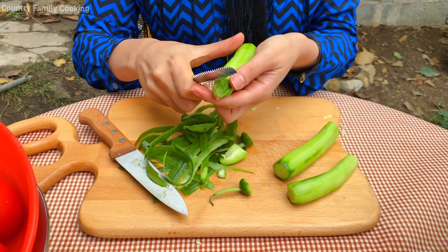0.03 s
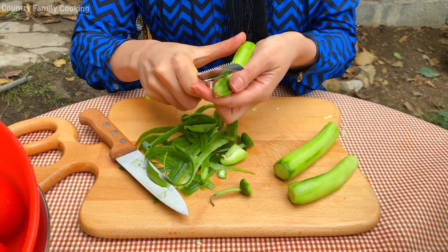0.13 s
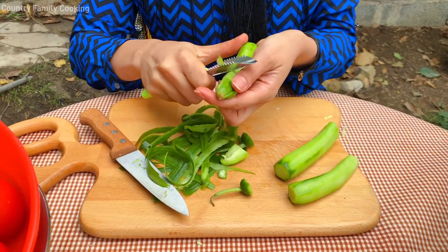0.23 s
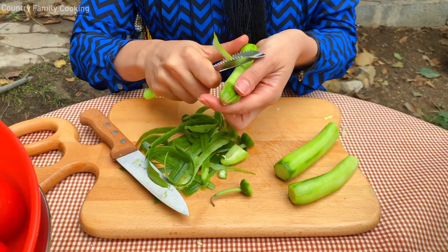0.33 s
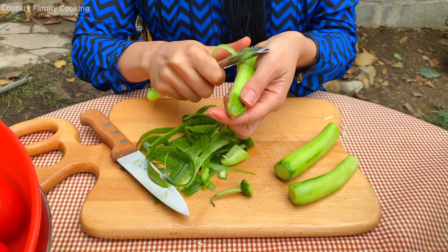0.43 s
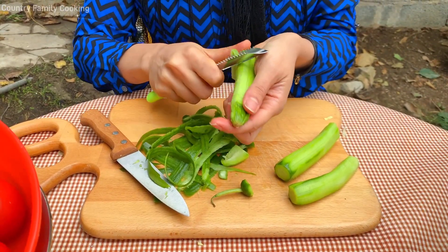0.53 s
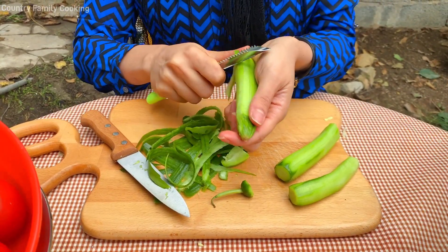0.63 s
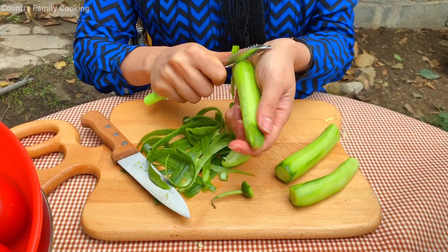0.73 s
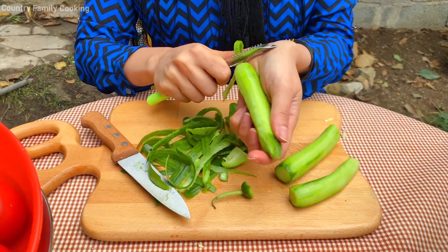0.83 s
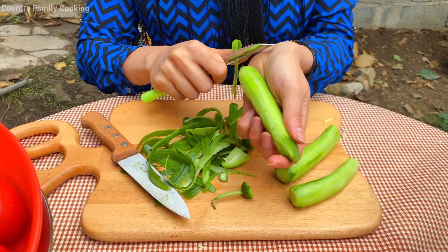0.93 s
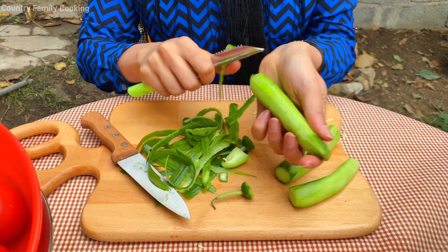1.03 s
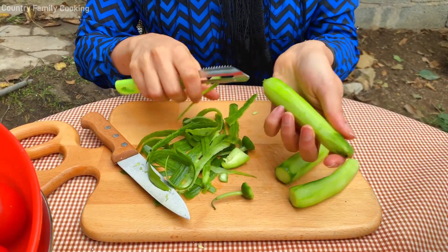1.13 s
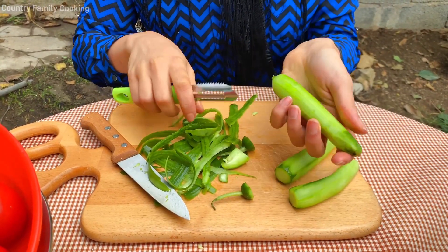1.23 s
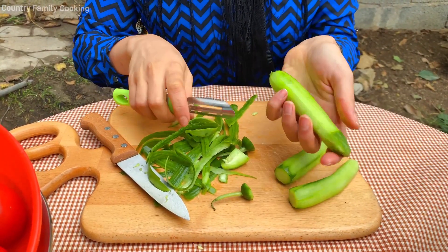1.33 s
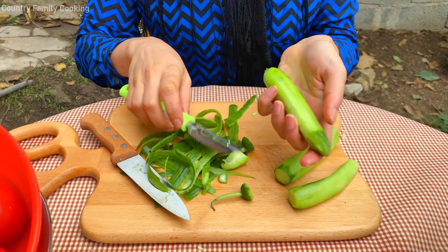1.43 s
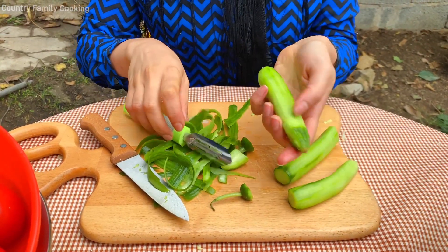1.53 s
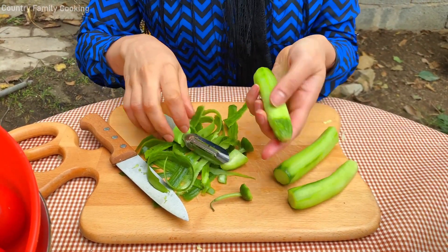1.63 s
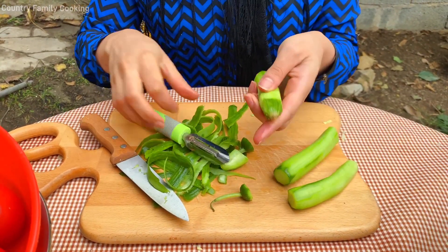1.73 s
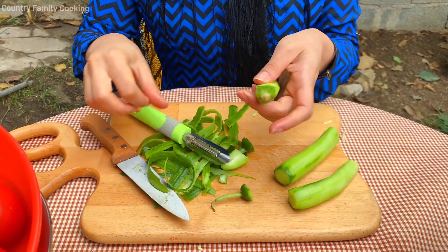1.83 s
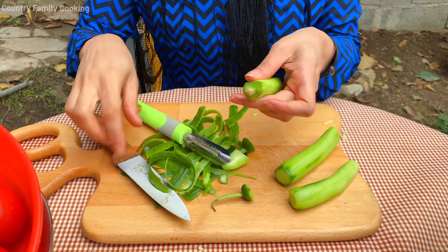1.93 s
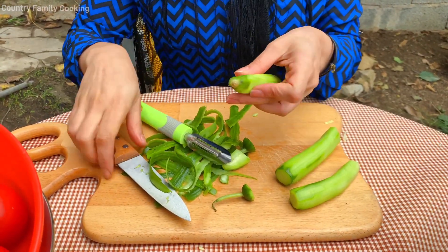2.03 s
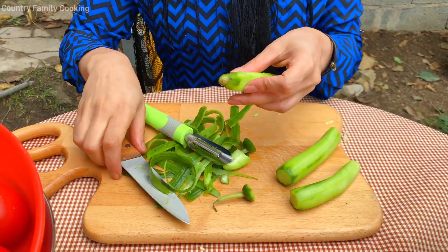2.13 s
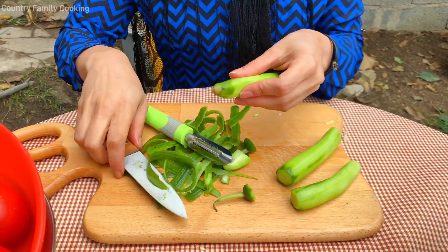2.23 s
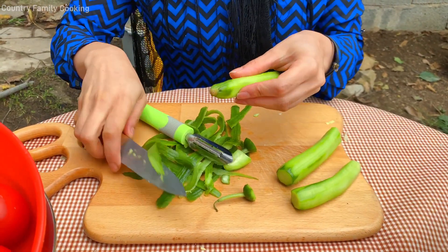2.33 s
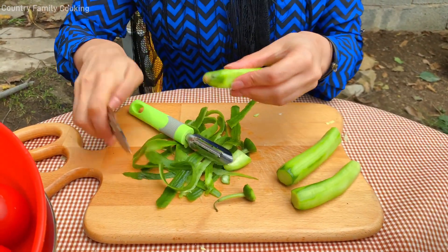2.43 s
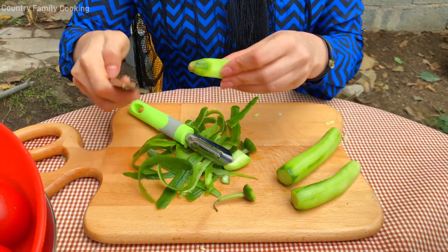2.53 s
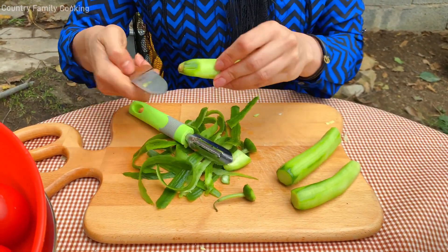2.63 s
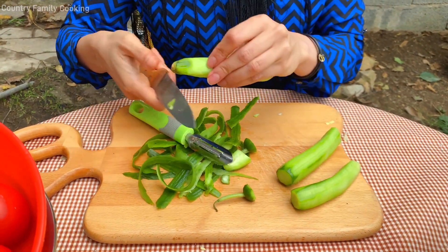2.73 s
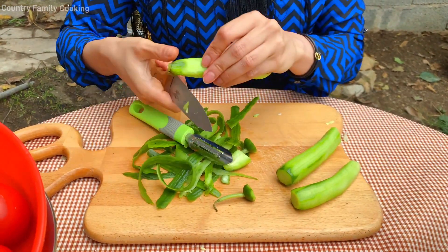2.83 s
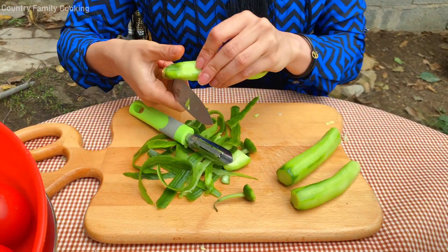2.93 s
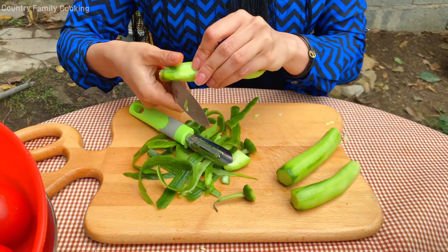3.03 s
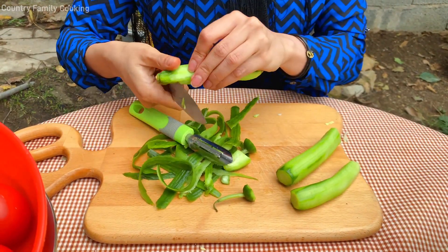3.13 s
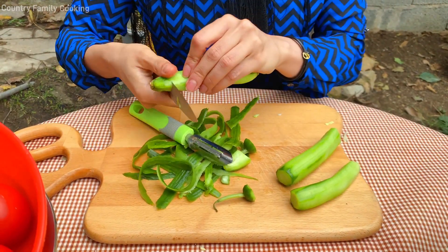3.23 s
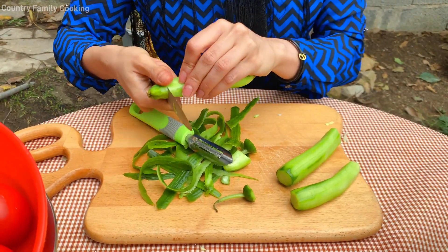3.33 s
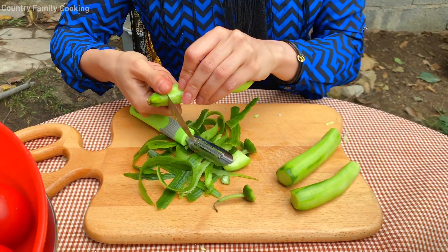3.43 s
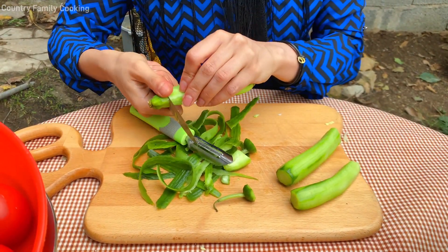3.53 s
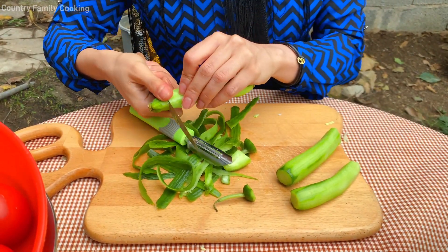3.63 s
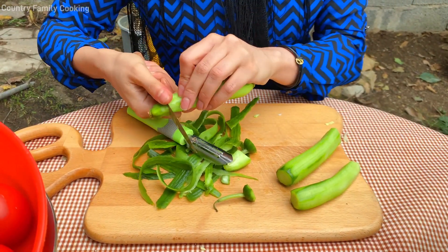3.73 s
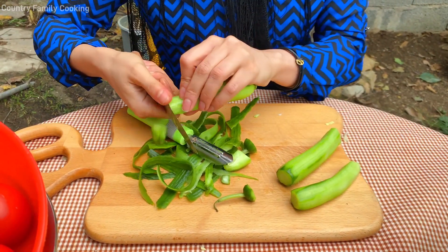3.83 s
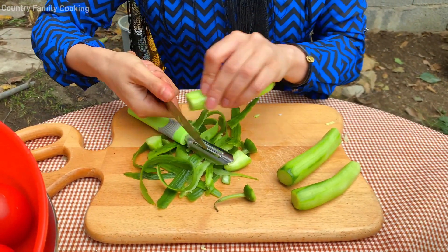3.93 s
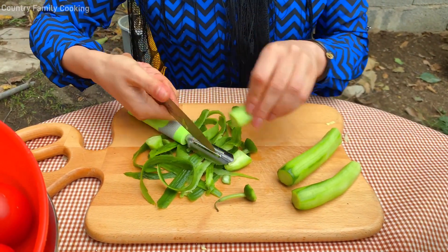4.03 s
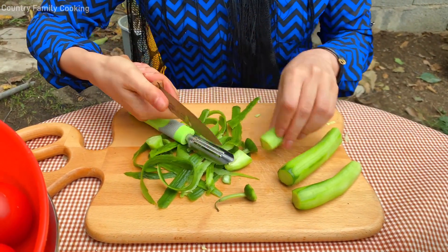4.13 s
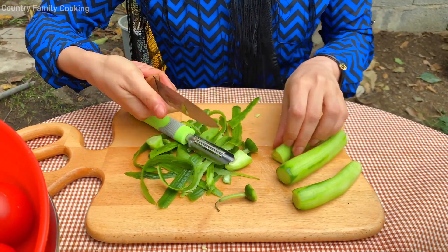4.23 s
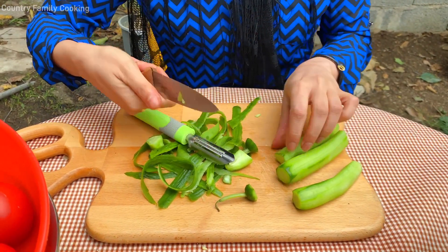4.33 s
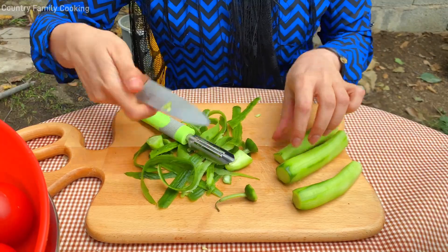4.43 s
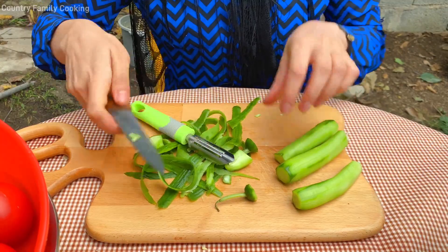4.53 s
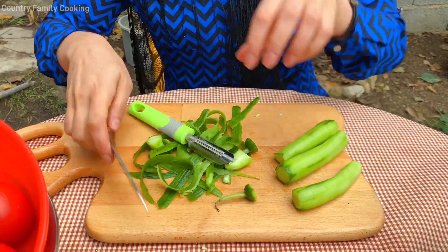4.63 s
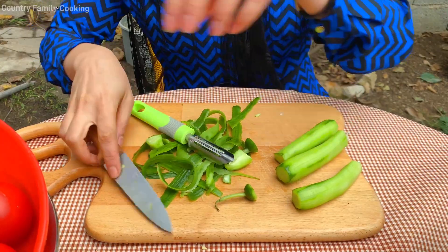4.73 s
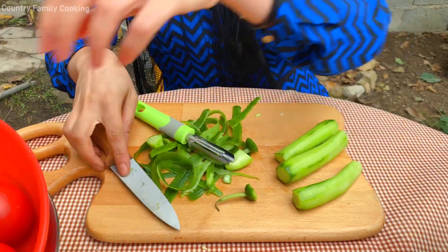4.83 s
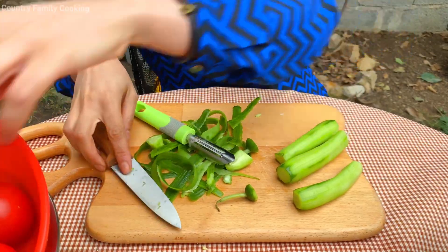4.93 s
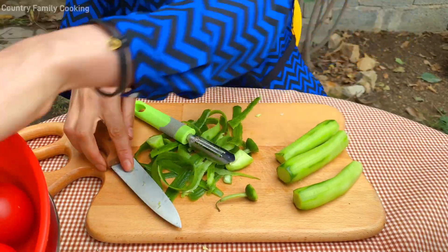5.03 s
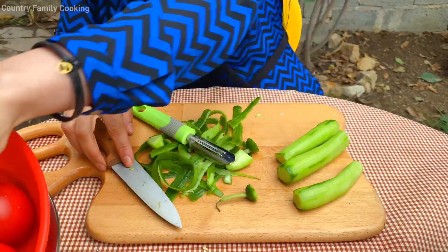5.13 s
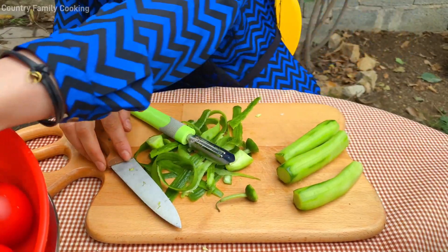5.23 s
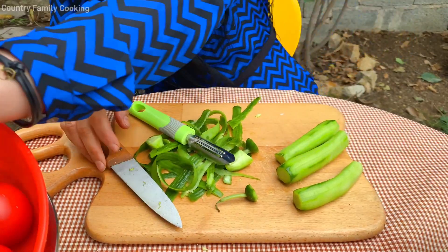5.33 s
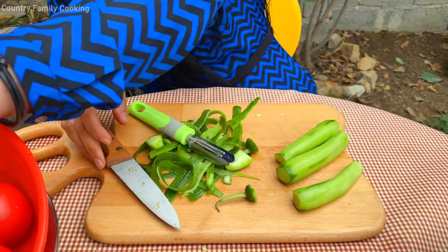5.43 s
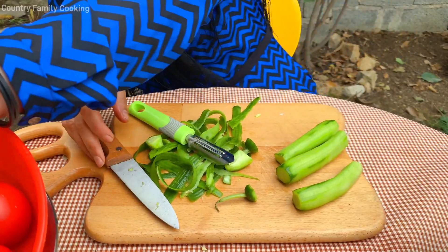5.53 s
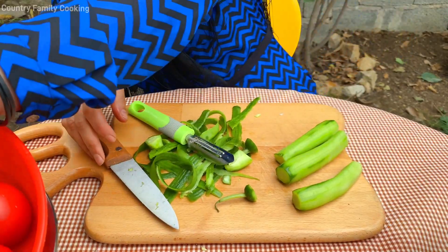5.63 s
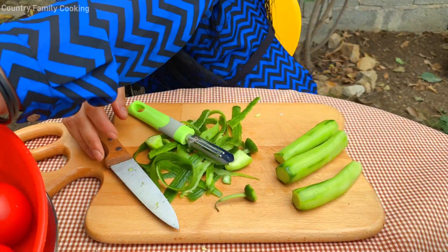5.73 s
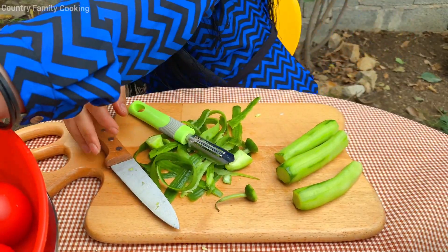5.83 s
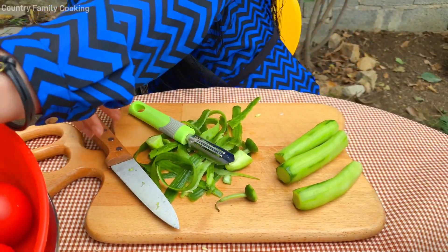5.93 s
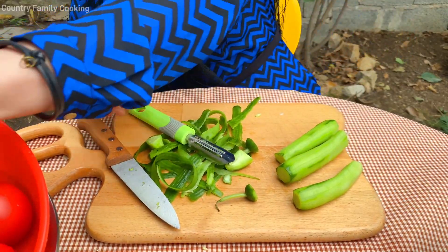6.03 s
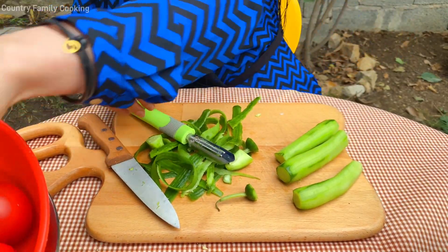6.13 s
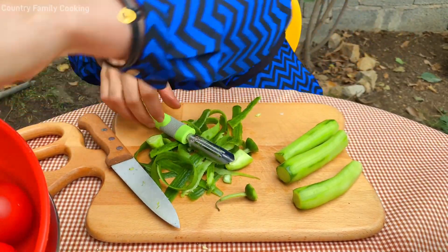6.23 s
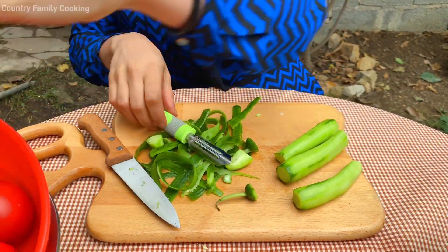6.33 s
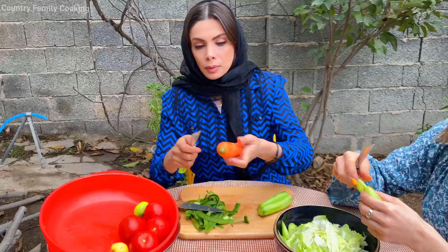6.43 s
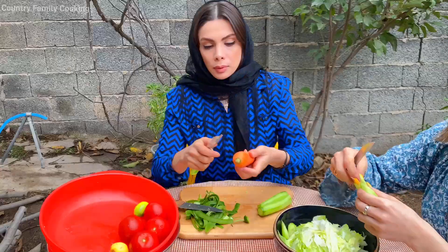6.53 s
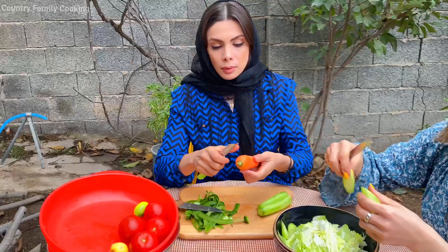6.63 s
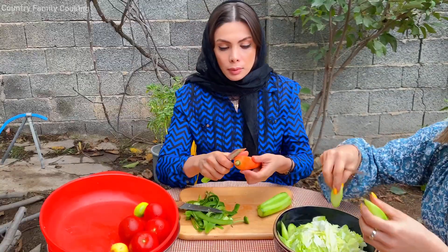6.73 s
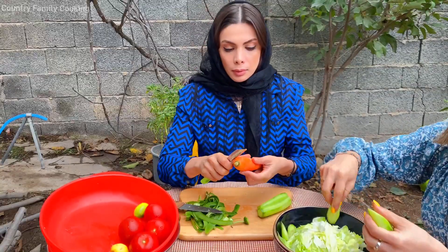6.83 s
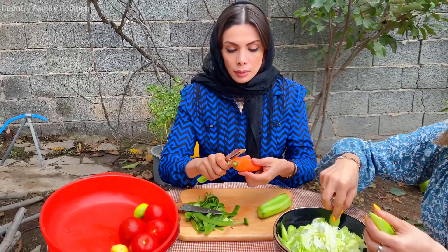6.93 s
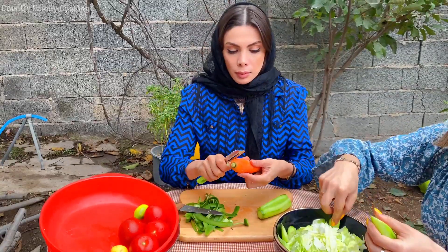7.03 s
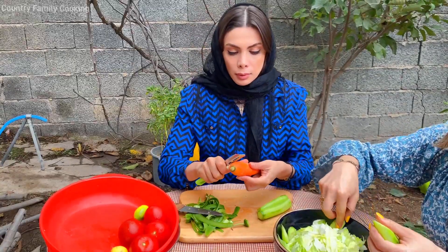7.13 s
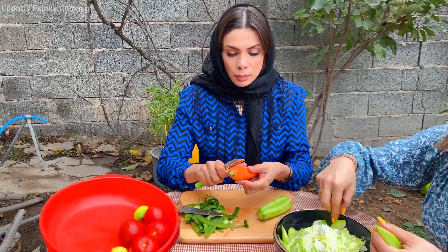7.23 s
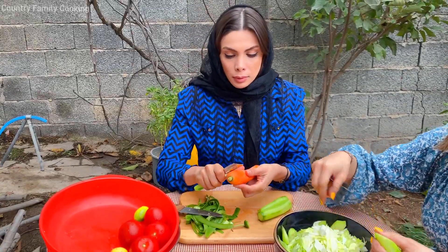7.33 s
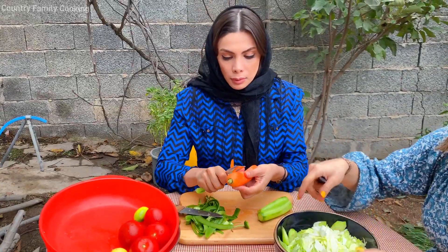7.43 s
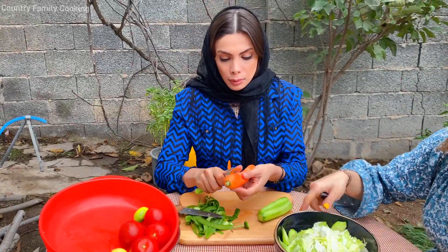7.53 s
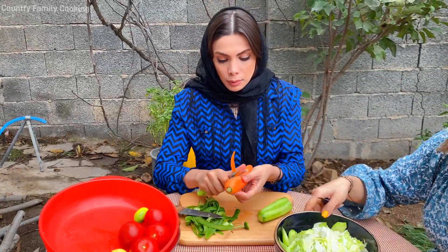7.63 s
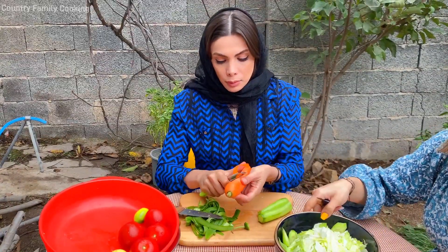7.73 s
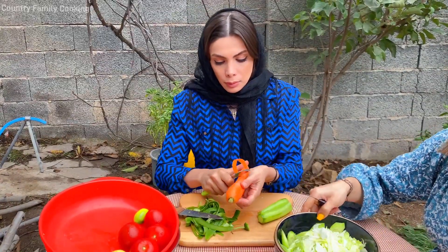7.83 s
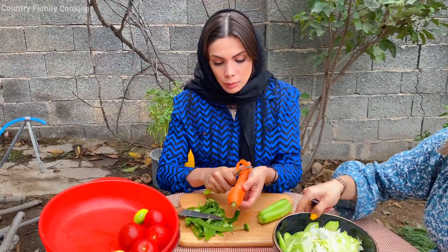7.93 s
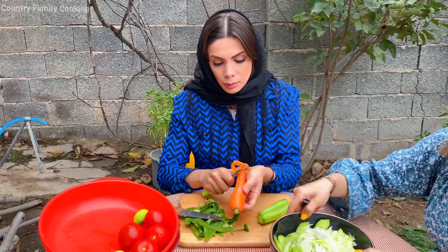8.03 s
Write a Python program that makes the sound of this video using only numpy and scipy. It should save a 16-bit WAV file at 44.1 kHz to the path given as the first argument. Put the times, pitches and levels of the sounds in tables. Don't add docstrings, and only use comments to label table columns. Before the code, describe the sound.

Close, quiet outdoor kitchen work: scraping peeler strokes, sharp wooden clatters, dull table thumps, a knife laid down, finally crisp carrot shaving farther off.

```python
import sys
import numpy as np
from scipy import signal
from scipy.fft import rfft, irfft, next_fast_len
from scipy.io import wavfile
from scipy.ndimage import uniform_filter1d, map_coordinates

SR = 44100
rng = np.random.default_rng(int(sys.argv[2]) if len(sys.argv) > 2 else 0)


def to_linear_factor(level_db):
    exponent = np.asarray(level_db, float) / 20
    return 10 ** exponent


def dump(signal):
    limited = np.clip(np.atleast_2d(signal).T, -1, 1)
    pcm = np.round(limited * 32767).astype(np.int16)
    wavfile.write(sys.argv[1], SR, pcm)


N = 357210

# f/Hz, level/dB, t60/s
BOARD_UNDER_KNIFE = [(454, 0.5, 0.0365), (620, -11, 0.027), (743, -10, 0.059), (900, -14.5, 0.064),
                     (1062.9, -6.5, 0.0665), (1282, -8, 0.0324), (1514, -15.5, 0.0374),
                     (1696, -13.5, 0.033)]


def rms_one(x):
    return x / np.sqrt(np.mean(x ** 2) + 1e-20)


def peak_one(x):
    return x / np.max(np.abs(x))


def add(out, s, sound):
    i = round(s * SR)
    out[i:i + len(sound)] += sound[:N - i]


def coloured(x, spectrum, low_hz=1, high_hz=30000):
    size = next_fast_len(N)
    hz = np.maximum(np.arange(size // 2 + 1) * SR / size, 1)
    points_hz, points_db = np.array(spectrum).T
    gain = to_linear_factor(np.interp(np.log(hz), np.log(points_hz), points_db))
    gain = gain / np.sqrt((1 + (low_hz / hz) ** 12) * (1 + (hz / high_hz) ** 8))
    return rms_one(irfft(rfft(x, size) * gain, size)[:N])


def drift(rate):
    r = np.exp(-20 * np.pi * rate / SR)
    noise = rng.standard_normal(N // 10 + 8002)
    slow = signal.lfilter([1], [1, -2 * r, r * r], noise)[8000:]
    return np.interp(np.arange(N) / 10, np.arange(len(slow)), rms_one(slow))


def rattle(count, lumpy_db):
    knots = rng.standard_normal(count // 130 + 2)
    return to_linear_factor(lumpy_db * np.interp(np.arange(count) / 130, np.arange(len(knots)), knots))


def resonate(x, hz, width_hz):
    r = np.exp(-np.pi * width_hz / SR)
    zeros = np.array([1, 0, -1]) * (1 - r * r) / 2
    poles = [1, -2 * r * np.cos(2 * np.pi * hz / SR), r * r]
    return signal.lfilter(zeros, poles, x)


def struck(modes, contact_s, spread_db):
    t = np.arange(int(.3 * SR)) / SR
    hz, level_db, t60 = np.array(modes).T[:, :, None]
    level_chance, pitch_chance = spread_db * rng.standard_normal((2, len(modes), 1))
    decay = to_linear_factor(level_db + level_chance - 60 * t / t60)
    rings = decay * np.sin(2 * np.pi * hz * (1 + .004 * pitch_chance) * t)
    signs = (-1) ** np.arange(len(modes))[:, None]
    return peak_one((signs * rings).sum(axis=0) * (1 - np.exp(-t / contact_s)) ** 2)


def dying_noise(low_hz, high_hz, t60):
    t = np.arange(int(.3 * SR)) / SR
    band = signal.butter(2, [low_hz, high_hz], "band", fs=SR, output="sos")
    noise = signal.sosfilt(band, rng.standard_normal(len(t)))
    return rms_one(noise * rattle(len(t), 2.5)) * to_linear_factor(-60 * t / t60)


def blows(rows, body, board, crack_db, flat_tail_db, flat_share, tail_t60, tail_hz, board_contact_s,
          knock_t60=0.042):
    out = np.zeros(N)
    for s, tick_db, board_db, board_hz, treble_db in rows:
        tail_db = max(flat_tail_db + flat_share * (board_db - tick_db), -35)
        modes = [(hz, db + treble_db * (hz > 5000), t60) for hz, db, t60 in body]
        crack = dying_noise(2200, 4070, 0.021)
        crack += to_linear_factor(treble_db + 4.5) * dying_noise(3500, 10000, 0.0092)
        tick = peak_one(struck(modes, 0.0001, 1) + to_linear_factor(crack_db) * crack)
        tick += to_linear_factor(tail_db) * dying_noise(1171, tail_hz, tail_t60)
        add(out, s, to_linear_factor(tick_db) * tick)
        knock = struck([(board_hz, 0, knock_t60)] + board, board_contact_s, 1)
        knock += to_linear_factor(tail_db + 6.5) * dying_noise(260, 950, tail_t60)
        add(out, s, to_linear_factor(board_db + 6.0) * knock)
    return out


def shaving(blade, skin, ring_db, grain_db, patchy_db, flex_s=0):
    torn = rng.random(N) < 14000 / SR
    grain_level_db = grain_db * np.minimum(rng.exponential(1, N), 4)
    grains = torn * to_linear_factor(grain_level_db) * rng.standard_normal(N)
    broad = coloured(grains, skin)
    rings = np.zeros(N)
    for k, (hz, width_hz, db) in enumerate(blade):
        ring = rms_one(resonate(resonate(grains, hz, width_hz), hz, 2 * width_hz))
        rings += to_linear_factor(db + patchy_db * drift(8.06)) * ring * (-1) ** k
    if flex_s:
        rings = map_coordinates(rings, [np.arange(N) + flex_s * SR * drift(5)], order=3)
    return rms_one(broad + to_linear_factor(ring_db) * rms_one(rings))


def strokes(sound, rows, sag_db_per_s, lift_db_per_s, judder_db, bite_s):
    t = np.arange(N) / SR
    pressure = np.zeros(N)
    for s, length, level_db, *_ in rows:
        since = t - s
        shape_db = -16.5 * np.clip(1 - since / bite_s, 0, 1)
        shape_db -= sag_db_per_s * since
        shape_db -= lift_db_per_s * np.maximum(since - length, 0)
        pressure += to_linear_factor(level_db + shape_db.clip(max=0)) * (since > 0)
    s, length, _, treble_db, top_db = np.transpose(rows)
    middle = s + length / 2
    share = np.clip(to_linear_factor(2 * np.interp(t, middle, treble_db)), .03, .9)
    low = signal.sosfiltfilt(signal.butter(3, 7800, fs=SR, output="sos"), sound)
    tilted = np.sqrt(1 - share) * rms_one(low) + np.sqrt(share) * rms_one(sound - low)
    top = signal.sosfiltfilt(signal.butter(3, 10200, "high", fs=SR, output="sos"), tilted)
    tilted = tilted + top * (to_linear_factor(np.interp(t, middle, top_db)) - 1)
    return tilted * uniform_filter1d(pressure, size=90) * to_linear_factor(judder_db * drift(59))


def slips(rows, rise_share, crest_db):
    out = np.zeros(N)
    for s, peak_db, length in rows:
        x = np.linspace(0, 1, max(int(length * SR), 20))
        rise = np.sin(np.pi / 2 * np.minimum(x / rise_share, 1))
        add(out, s, to_linear_factor(peak_db - crest_db) * rise * np.sqrt(1 - x ** 2))
    return out


def yard():
    # t/s, rumble level/dB
    leaning = [(0.0, -65), (1.37, -67), (2.26, -64), (3.95, -63.5), (4.11, -50.5), (4.2, -60),
               (5.16, -62.5), (5.32, -58.5), (5.77, -59.5), (5.93, -52), (6.07, -59.5), (6.35, -59),
               (7.06, -65.5), (8.1, -62)]
    # f/Hz, level/dB per Hz
    far_spectrum = [(16, -21.5), (28, 3.5), (81, -7.5), (121, 2.5), (200, -4), (234, -4.5), (331, -12.5),
                    (421, -16.5), (660, -16), (933, -19.5), (2020, -25.5), (7610, -30), (16000, -39.5)]
    t = np.arange(N) / SR
    rumble_db = np.interp(t, *np.transpose(leaning))
    over_quiet_db = rumble_db + 67.5
    nearing = np.maximum(t - 6.646, 0)
    hum_db = -76 + 0.52 * over_quiet_db + 4 * np.tanh(nearing / 0.0522) + 1 * nearing
    air_db = -75 + 0.089 * over_quiet_db + 3 * nearing
    white = rng.standard_normal((4, N))
    deep = to_linear_factor(-77.5 + 2.7 * drift(6.4)) * coloured(white[0], far_spectrum, 28, 43.3)
    rumble = to_linear_factor(rumble_db + 1.57 * drift(8.6)) * coloured(white[1], far_spectrum, 54, 460)
    hum = to_linear_factor(hum_db + 1.2 * drift(7)) * coloured(white[2], far_spectrum, 350, 1850)
    air = to_linear_factor(air_db + .5 * drift(4)) * coloured(white[3], far_spectrum, low_hz=1850)
    return deep + rumble + hum + air


def cucumber_peeling():
    # t/s, length/s, level/dB, treble share/dB, top/dB
    cucumber = [(0.066, 0.0148, -61, -0.5, -3.5), (0.1, 0.0118, -63, -1.5, -3.5),
                (0.148, 0.0714, -55, -1.5, -3.5), (0.22, 0.0652, -60, -2, 1), (0.294, 0.0361, -58, -2, 1),
                (0.338, .11, -59.5, -5, 3.5), (0.519, 0.0333, -59, -3, 1.5),
                (0.555, 0.0916, -59.5, -2.5, -1.5), (0.671, 0.0205, -55.5, -2, -4),
                (0.702, 0.0356, -51.5, -1.5, -10), (0.747, 0.0209, -57.5, -2.5, -7)]
    # t/s, peak level/dB
    catches = [(0.0241, -50), (0.211, -36), (0.245, -43), (0.271, -44), (0.316, -35), (0.324, -37),
               (0.366, -41.5), (0.415, -48), (0.572, -48), (0.74, -38.5)]
    # f/Hz, bandwidth/Hz, level/dB
    blade = [(2392.6, 296, 0), (3507, 164, -1.5), (4630, 750, 2), (5910, 220, -0.5), (7500, 220, -16),
             (8800, 182.4, -3.5), (8708, 710, 0), (11390, 777, -10), (12792, 370, -10.5),
             (14230, 540, -13.5)]
    # f/Hz, level/dB per Hz
    skin = [(880, -12), (1500, -2.5), (1960, -55.5), (2660, 11.5), (3960, -1), (7170, 7), (8830, -6.5),
            (9950, -21), (14300, -9), (16000, -20)]
    near = shaving(blade, skin, ring_db=0, grain_db=1.2, patchy_db=2.5, flex_s=.0003)
    long_strokes = strokes(near, cucumber, sag_db_per_s=24, lift_db_per_s=603.5, judder_db=0.2, bite_s=.013)
    snag_s = 0.00882
    return long_strokes + near * slips([(*row, snag_s) for row in catches], 0.23, 18.9)


def rustles():
    # t/s, level/dB, length/s, centre f/Hz
    rubs = [(0.151, -70, .06, 1190), (1.199, -76, 0.0501, 6460), (2.05, -74.5, .08, 5000),
            (2.381, -77.5, .2, 6000), (6.5, -70, .12, 1300), (2.139, -75, 0.081, 6000),
            (2.283, -72, 0.065, 7200), (5.095, -75, 0.04615, 9000), (5.172, -80.5, 0.1196, 3500),
            (5.189, -77.5, 0.091, 8500), (5.398, -75, .06, 6000), (5.95, -76, .1, 4000),
            (4.85, -66, .05, 1500), (1.6, -62, .05, 3000), (3.97, -64, 0.047, 6000), (6.32, -64, .06, 600),
            (5.492, -59.5, 0.074, 470), (5.505, -85.5, 0.059, 1300), (5.51, -71.5, 0.0459, 4400),
            (5.519, -76, .04, 8200), (5.769, -72.5, 0.039, 6000), (5.901, -78, 0.187, 9000),
            (6.019, -75, 0.055, 8296), (6.051, -70, .07, 1200), (6.26, -72.5, 0.046, 797.5)]
    out = np.zeros(N)
    for s, level_db, length, hz in rubs:
        count = int(length * SR)
        rub = rms_one(resonate(rng.standard_normal(9000), hz, 600 + hz / 8))[:count]
        add(out, s, to_linear_factor(level_db) * np.hanning(count) * rub)
    return out


def peeler_landings():
    # t/s, tick peak/dB, board level/dB, loudest board mode f/Hz, treble re tick/dB
    drops = [
        (1.424, -56, -86.5, 352.6, -15.5),
        (1.544, -14, -30.5, 853.4, -14.5),
        (1.5685, -39.5, -53, 620, -15),
    ]
    bounces = [
        (1.5936, -23, -39.5, 852, -8.5),
        (1.6155, -32.5, -45.5, 872, -16),
        (1.6285, -47, -52, 875, -18),
        (1.643, -57.5, -63.5, 889.8, -15.5),
        (2.0072, -41, -61, 430.1, -1),
        (2.021, -54, -71, 422, 1),
        (6.2282, -49.5, -64, 890, -3.5),
    ]
    # f/Hz, level/dB, t60/s
    peeler = [(1649.3, -19.5, 0.0713), (2219, -24, 0.098), (2404, 8, 0.0083), (2728, -22.5, .04),
              (3095, -7.5, 0.015), (3266, -27.5, 0.11), (3538, -11, 0.03), (4065, 1.5, 0.0097),
              (5280, -3.5, 0.012), (6255, 4.5, 0.011), (7606, -8.5, 0.012), (8120, -17.5, 0.0049)]
    # f/Hz, level/dB, t60/s
    peeler_end = [(1640, -8, 0.0166), (2415, 1.5, 0.0183), (2980, -1, 0.0138), (3670, 1, 0.019),
                  (4120, -1, 0.0134), (5270, 2, 0.0156), (6000, -0.5, .012), (7334, -4.5, .012),
                  (8500, -10, .01)]
    # f/Hz, level/dB, t60/s
    board = [(376.94, -11, 0.116), (560, -14.5, 0.066), (742.4, -15, 0.091), (1123, -8.5, .04),
             (988, -11, 0.0353), (1300, -14.5, 0.08)]
    landings = blows(drops, peeler, board, crack_db=-13.5, flat_tail_db=-15, flat_share=0.845,
                     tail_t60=0.146, tail_hz=4200, board_contact_s=0.00021, knock_t60=0.0268)
    rebounds = blows(bounces, peeler_end, board, crack_db=-13.5, flat_tail_db=-12.5, flat_share=0.97,
                     tail_t60=0.152, tail_hz=3700, board_contact_s=0.00027, knock_t60=0.0353)
    return landings + rebounds


def table_booms():
    # t/s, peak level/dB, f/Hz, after-ring/dB
    thuds = [(1.545, -35, 315, 1.5), (1.594, -43, 306, 5), (2.002, -49.5, 217, -0.5),
             (2.126, -50.5, 221, -6), (2.905, -20, 196.1, -9), (3.081, -36, 155, 2.5),
             (3.953, -22.5, 160.3, -7.5), (4.027, -24.5, 180.7, -0.85), (4.068, -37, 148, 8.5),
             (4.211, -31.5, 121.8, -1), (4.24, -42.5, 112, -11.5), (4.758, -33.5, 118, -6.5),
             (4.8, -30, 119, -10), (4.828, -24.5, 168.4, -2), (5.123, -43, 210.3, 2),
             (5.16, -40.5, 167, 7.5), (5.306, -42, 181, -4.5), (5.415, -46, 187.8, -2.5),
             (5.484, -44, 185.9, 1), (5.528, -47, 110, 5), (5.764, -33.5, 263.5, 9),
             (5.848, -30, 157.3, -4.5), (5.9, -41, 213.6, -6), (6.296, -33, 194.6, 3.5),
             (6.327, -42.5, 121, 3), (6.354, -35.5, 212.4, 1)]
    # f/Hz, level/dB, t60/s
    table = [(89.55, -29, 0.21), (149.46, -23, 0.2374), (199.7, -21.5, 0.12), (272.4, -13.5, 0.0826)]
    out = np.zeros(N)
    for s, peak_db, hz, ring_db in thuds:
        dent = (hz, 0, 0.0357)
        ringing = [(mode_hz, db + ring_db, t60) for mode_hz, db, t60 in table]
        boom = struck([dent] + ringing, contact_s=.7 / hz, spread_db=1)
        add(out, s + .001, to_linear_factor(peak_db) * boom)
    return out


def far_tones():
    # start t/s, end t/s, f/Hz, level/dB, wander/Hz
    tones = [(2.667, 3.135, 663, -75, 3.628), (3.115, 3.77, 568, -74, 4.03), (4.23, 4.4, 3950, -82.5, 24),
             (6.58, 6.846, 94, -61.5, 9.1), (6.95, 7.45, 67, -63, 3.95), (6.836, 7.02, 78, -63, 6.5),
             (6.86, 7.727, 161.7, -60.5, 4.74), (8.1, 8.13, 1325, -72.5, 1.34),
             (8.1, 8.2, 1800, -75.5, 1.5), (7.94, 7.958, 2390, -72.5, 1.38)]
    t = np.arange(N) / SR
    out = np.zeros(N)
    for start, end, hz, level_db, wander_hz in tones:
        swell = np.clip(np.minimum(t - start, end - t) / (0.15 * (end - start)), 0, 1)
        phase = 2 * np.pi * np.cumsum(hz + wander_hz * drift(4.578)) / SR
        out += to_linear_factor(level_db - 1.5 + 2.0 * drift(24)) * swell * np.sin(phase)
    return out


def vegetable_blows():
    # t/s, tick peak/dB, board level/dB, loudest board mode f/Hz, treble re tick/dB
    knuckle = [
        (2.9046, -44, -45.5, 842, 0),
        (3.084, -70, -62, 454, 0),
    ]
    set_down = [(7.7055, -60.5, -82.5, 600, 12.5), (7.951, -55, -79.5, 600, 9),
                (5.1246, -58.5, -52, 456, 4.5), (5.3084, -57.5, -53.5, 676, 2.5),
                (5.43, -61.5, -69, 490.1, 9), (5.699, -74, -66.5, 602, 1), (5.729, -55, -69, 490.1, 9.5),
                (5.7649, -52.5, -51, 450, -3), (5.8297, -52, -80, 465.6, 5),
                (5.8482, -39.5, -45, 369, -0.5), (5.905, -58, -61, 900, 6), (6.0697, -71.5, -66, 1213, -5)]
    # f/Hz, level/dB, t60/s
    vegetable = [(2100, -10, 0.01), (2810, -5, 0.0127), (3780, -2, 0.02), (4490, 2, 0.02),
                 (5570, -5.5, 0.0146), (6820, -4.5, 0.0175), (7700, -3, .012), (9000, -2.5, 0.02),
                 (10960, -6.5, 0.012)]
    # f/Hz, level/dB, t60/s
    board = [(405, -3, 0.114), (456, -5.5, 0.076), (548.9, -4, 0.078), (720.5, -18.5, 0.108),
             (876.4, -26.5, 0.164), (1155, -11.5, 0.0187), (1321, -4.5, 0.0342)]
    knocks = blows(knuckle, vegetable, BOARD_UNDER_KNIFE, crack_db=-5, flat_tail_db=-13.5, flat_share=0,
                   tail_t60=0.128, tail_hz=7030, board_contact_s=0.00038)
    landings = blows(set_down, vegetable, board, crack_db=-8.5, flat_tail_db=-16.5, flat_share=0.102,
                     tail_t60=0.13, tail_hz=7030, board_contact_s=0.00085)
    return knocks + landings


def knife_nicks():
    # t/s, peak level/dB, length/s
    nicks = [(3.111, -46.5, 0.0207), (3.1637, -46.5, 0.0199), (3.2167, -48.5, 0.0244),
             (3.2813, -51.5, 0.0098), (3.3265, -54, 0.01065), (3.6974, -62.5, 0.0159),
             (3.7091, -58.5, 0.01308), (3.7253, -46, 0.0105), (3.744, -53.5, 0.0098),
             (3.8483, -58.5, 0.0106), (5.5144, -72.5, 0.043), (6.0294, -60.5, 0.036)]
    # f/Hz, bandwidth/Hz, level/dB
    blade = [(3044, 100, 1), (4430, 77, 7.5), (5218, 350, 15.5), (6750, 120, 10), (10400, 180, -26.5),
             (12400, 95, 1.5)]
    # f/Hz, level/dB per Hz
    skin = [(1060, -46), (1800, -24), (3090, 1), (4570, -12.5), (5290, -5), (13400, -12), (16000, -21.5)]
    cutting = shaving(blade, skin, ring_db=-6, grain_db=2, patchy_db=2)
    return cutting * slips(nicks, 0.0525, 11.23)


def cut_end_blows():
    # t/s, tick peak/dB, board level/dB, loudest board mode f/Hz, treble re tick/dB
    cut_end = [
        (3.875, -63, -71.5, 900, -20),
        (3.9543, -30, -38, 405, -5),
        (4.0276, -36, -44, 567, -17.5),
        (4.07, -43, -51.5, 410, -20),
        (4.1915, -53.5, -65, 353, -11.5),
        (4.227, -52, -67.5, 365, 5.5),
    ]
    # f/Hz, level/dB, t60/s
    cucumber_end = [(2466, -5.5, 0.03), (2795, 6, 0.0162), (3450, -8.5, 0.089), (3904, -3.5, 0.0267),
                    (4350.6, -18, 0.0583), (4703, -11.5, 0.054), (6460, -1.5, 0.029), (8200, -0.5, 0.0176),
                    (8910, -16.5, 0.027)]
    # f/Hz, level/dB, t60/s
    board = [(299, -6, 0.055), (560, -6, 0.114), (726, -21.5, 0.078), (1074, -5, 0.051), (1387, -1, .03)]
    return blows(cut_end, cucumber_end, board, crack_db=-12, flat_tail_db=-16.0, flat_share=0.128,
                 tail_t60=0.156, tail_hz=6680, board_contact_s=0.00078)


def loose_blade():
    # t/s, peak level/dB
    jolts = [
        (3.9545, -30),
        (4.0277, -49),
    ]
    # f/Hz, level/dB, t60/s
    steel = [(3470, -5.5, 0.088), (3670, -3, 0.092), (3884, 1.5, 0.051), (4080, -3, 0.134),
             (4400, -7.5, .1), (5233, -4.5, 0.084), (5268, -5.5, 0.157), (10690, -15, 0.184)]
    out = np.zeros(N)
    for s, peak_db in jolts:
        for mode in steel:
            ring = struck([mode], 0.00039, spread_db=2.5)
            add(out, s, to_linear_factor(peak_db - 15 + mode[1]) * ring * rattle(len(ring), 6))
    return out


def knife_landings():
    # t/s, tick peak/dB, board level/dB, loudest board mode f/Hz, treble re tick/dB
    tip = [
        (4.6775, -53, -78, 436, -10.5),
        (4.7516, -56, -65, 349.9, -4.5),
        (4.7573, -18.5, -35, 476.7, 2),
        (4.7597, -26.5, -48, 488, -1.5),
        (4.767, -46.5, -60, 490, 4),
        (4.7828, -40.5, -60.5, 366, -10),
    ]
    flat = [
        (4.8011, -24.5, -30, 1083, -10.5),
        (4.8048, -32.5, -39, 697.4, -11),
        (4.816, -37, -44, 1088, -16),
        (4.8266, -27, -33, 882.4, 1),
        (4.838, -45.5, -43.5, 500.6, 2.5),
    ]
    # f/Hz, level/dB, t60/s
    blade_tip = [(2207, -7, 0.031), (2908, -5.5, 0.0216), (3480, -17.5, 0.035), (4106, -19.5, 0.0211),
                 (5700, -3, 0.0148), (6727, -1, 0.013), (7470, -5, 0.01435), (8900, -3, 0.0112),
                 (9283, -3, 0.0094), (10970, -16, 0.0077), (12420, -10.5, 0.0068)]
    # f/Hz, level/dB, t60/s
    whole_knife = [(2281, 3, 0.0222), (2564, 1, 0.0262), (3058, -8.5, 0.022), (3852, -5, 0.0223),
                   (4105, -1, 0.017), (5255, -10.5, 0.0176), (5930, -8.5, 0.0165), (7340, -10.5, 0.0144),
                   (8500, -10, 0.0123), (9380, -6.5, .012), (11340, -6, 0.0142), (12450, -7.5, .01)]
    # f/Hz, level/dB, t60/s
    under_tip = [(560, -5.5, 0.0265), (1102, -5, .09), (1223, -5, 0.023), (1600, -19.5, 0.0194)]
    touches = blows(tip, blade_tip, under_tip, crack_db=-15, flat_tail_db=-25.5, flat_share=0.29,
                    tail_t60=0.114, tail_hz=9000, board_contact_s=0.0004)
    falls = blows(flat, whole_knife, BOARD_UNDER_KNIFE, crack_db=-10.5, flat_tail_db=-21.5, flat_share=1.74,
                  tail_t60=0.204, tail_hz=6000, board_contact_s=0.0001, knock_t60=0.072)
    return touches + falls


def pick_up_knocks():
    # t/s, tick peak/dB, board level/dB, loudest board mode f/Hz, treble re tick/dB
    pick_up = [
        (6.3, -39, -48.5, 585.6, -10.5),
        (6.327, -53, -62.5, 560, -10),
        (6.3556, -45.5, -54, 525, -17.5),
        (7.755, -60, -85, 839.4, 3),
    ]
    # f/Hz, level/dB, t60/s
    handle = [(2305.3, -4, 0.031), (2874, 1, 0.043), (3950, 2, 0.0258), (4870, -16, 0.017),
              (6135, -5.5, 0.0201), (7300, -5, .015)]
    # f/Hz, level/dB, t60/s
    board = [(416.7, -3, 0.137), (530.6, -2, .09), (660, -5, .07), (1300, -15.5, 0.042), (1597, -14, 0.039)]
    return blows(pick_up, handle, board, crack_db=-5, flat_tail_db=-14.5, flat_share=0.15,
                 tail_t60=0.195, tail_hz=6780, board_contact_s=0.00079)


def carrot_peeling():
    # t/s, peak level/dB
    nibbles = [
        (7.0144, -55),
        (7.04, -55.5),
        (7.0574, -50.5),
        (7.095, -46),
        (7.1261, -44.5),
    ]
    # t/s, length/s, level/dB, treble share/dB, top/dB
    carrot = [(7.202, 0.0174, -54.5, -0.9, 0.031), (7.233, 0.0175, -53, -1.55, 0.035),
              (7.295, 0.012, -73, 0.16, 0), (7.341, 0.0448, -55, -0.85, 0.019),
              (7.385, 0.0323, -55.5, -1.4, 1), (7.43, 0.0093, -57.5, -1.5, 0),
              (7.567, 0.1015, -53, -1.68, 0), (7.772, 0.109, -54, -1.9, 0.068),
              (7.995, 0.034, -79, 0, 0.0039), (8.027, .08, -54.5, 0, 0)]
    # f/Hz, bandwidth/Hz, level/dB
    biting_blade = [(3035, 453, -7), (4920, 150, -2.5), (5300, 140, -23.5), (6840, 200, -17),
                    (8593, 480, -11.5), (9320, 440, -10), (11400, 400, -21.5), (14200, 400, -17.5)]
    # f/Hz, bandwidth/Hz, level/dB
    blade = [(2730, 710, -9), (3375.7, 660, -6), (4793, 240, -3), (5283, 233, -8.5), (5966, 260, -7.5),
             (6400, 360, -13), (7163, 350, -6), (8443, 410, -9), (9413, 490, -7), (11830, 900, -17.5),
             (14000, 600, -29)]
    # f/Hz, level/dB per Hz
    skin = [(880, -6), (1500, -9.5), (2690, -4), (3960, -8), (4780, 2), (5380, -2.5), (7000, -1),
            (9300, -3), (10600, -13), (13400, -14), (14600, -14.5), (16000, -36)]
    bite = shaving(biting_blade, skin, ring_db=6, grain_db=.5, patchy_db=1.5)
    far = shaving(blade, skin, ring_db=-.5, grain_db=1, patchy_db=2.5, flex_s=.0003)
    long_strokes = strokes(far, carrot, sag_db_per_s=24.5, lift_db_per_s=1099.5, judder_db=1.2, bite_s=.007)
    nibble_s = 0.021
    return long_strokes + bite * slips([(*row, nibble_s) for row in nibbles], 0.26, 10.84)


def bowl_taps():
    # t/s, peak level/dB
    taps = [
        (7.0765, -53.5),
        (7.6892, -38.5),
        (7.708, -56),
    ]
    # f/Hz, level/dB, t60/s
    bowl = [(1526.3, -18, 0.212), (2605, -14.5, 0.115), (4000, -12, 0.085), (5530, -2.5, 0.073),
            (6110, -7, 0.089), (6600, -35, 0.69), (7230, -1, 0.076), (7640, -22, 0.077),
            (9100, -10.5, 0.09)]
    out = np.zeros(N)
    for s, peak_db in taps:
        ring = struck(bowl, .0002, spread_db=1.5)
        add(out, s, to_linear_factor(peak_db) * ring * rattle(len(ring), 2.5))
    return out


def scene():
    skin_cutting = cucumber_peeling() + knife_nicks() + carrot_peeling()
    tools = peeler_landings() + knife_landings() + pick_up_knocks()
    vegetables = vegetable_blows() + cut_end_blows()
    steel = loose_blade() + bowl_taps()
    background = yard() + far_tones()
    return (background + skin_cutting + rustles() + tools + vegetables + table_booms() + steel)[None, :]


def roll_off(x):
    return signal.sosfilt(signal.butter(12, 15850, fs=SR, output="sos"), x)


def record(dry):
    bass_cut = signal.butter(4, 28, "high", fs=SR, output="sos")
    mix = signal.sosfilt(bass_cut, dry)
    return roll_off(mix)


dry = scene()
out = record(dry)
dump(out)
```